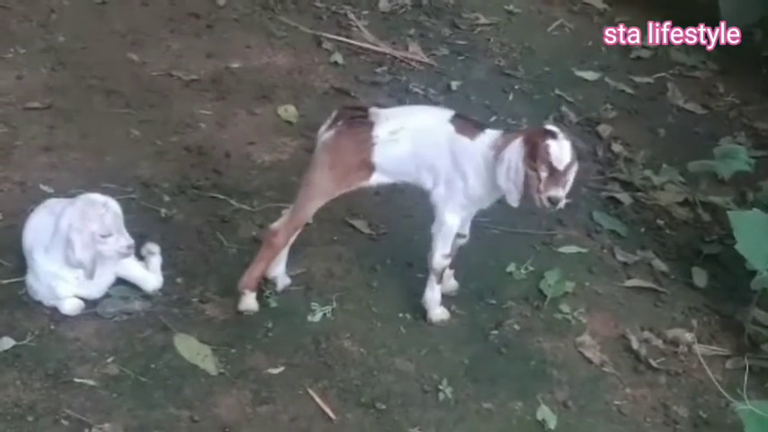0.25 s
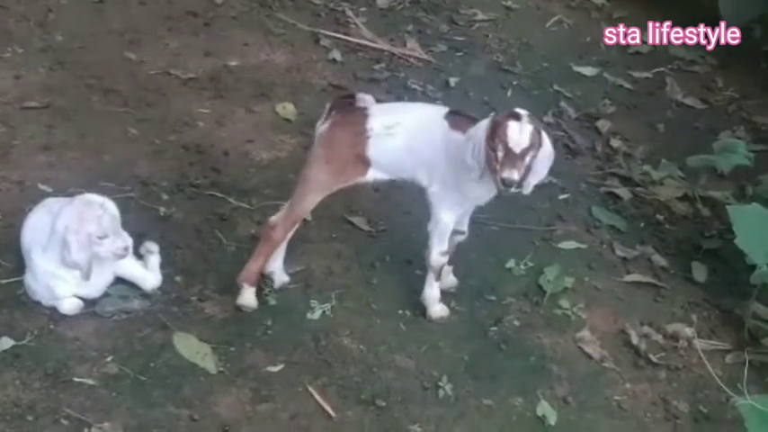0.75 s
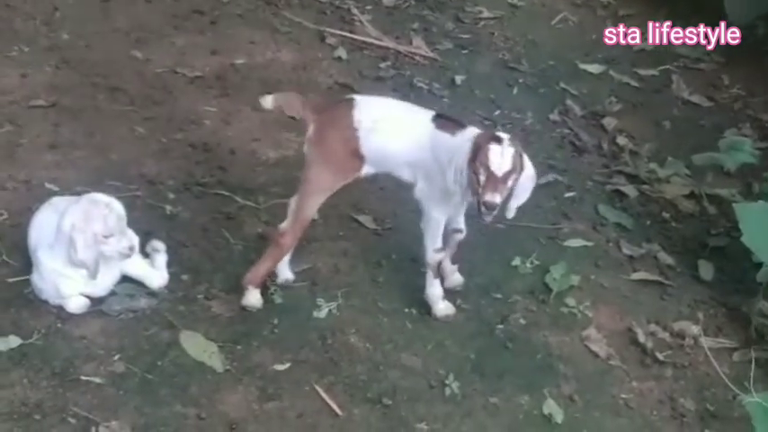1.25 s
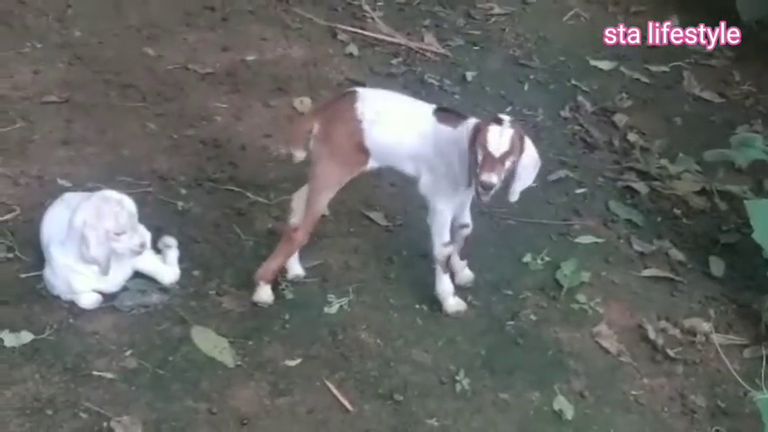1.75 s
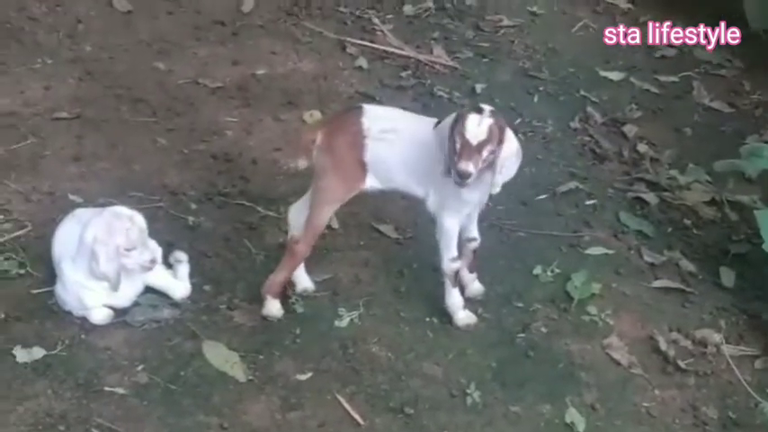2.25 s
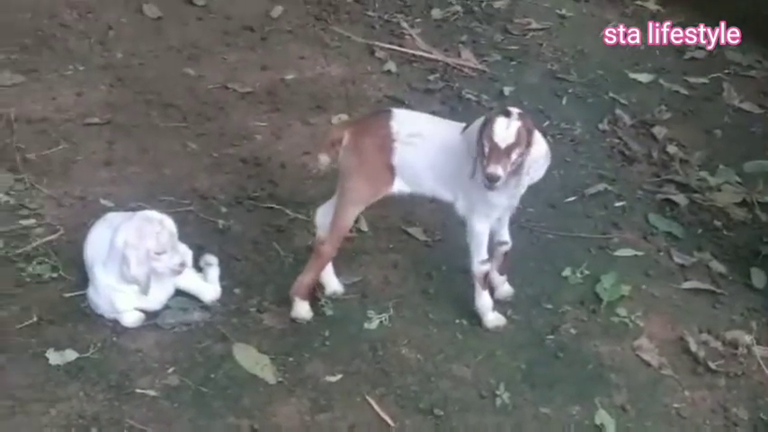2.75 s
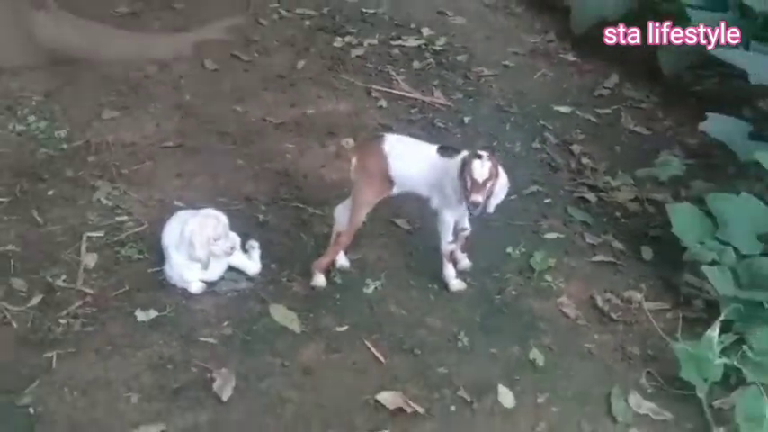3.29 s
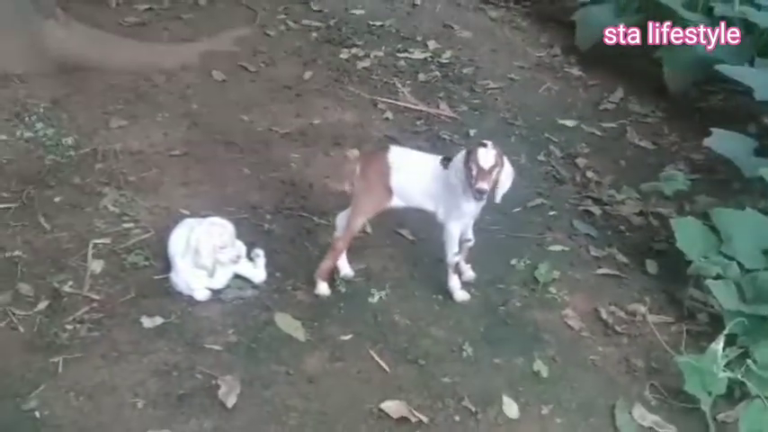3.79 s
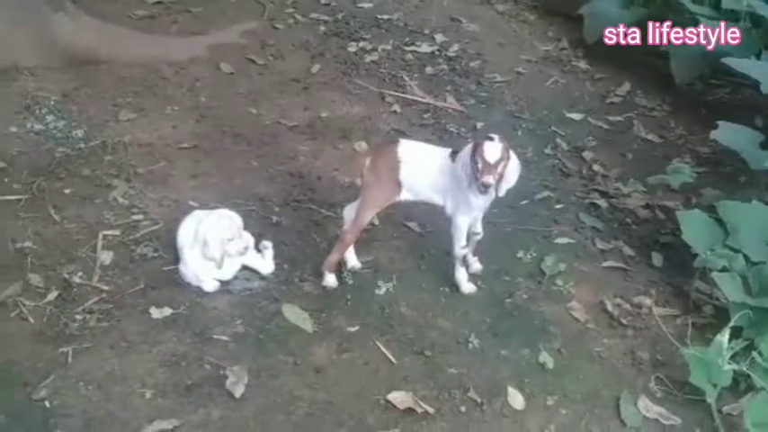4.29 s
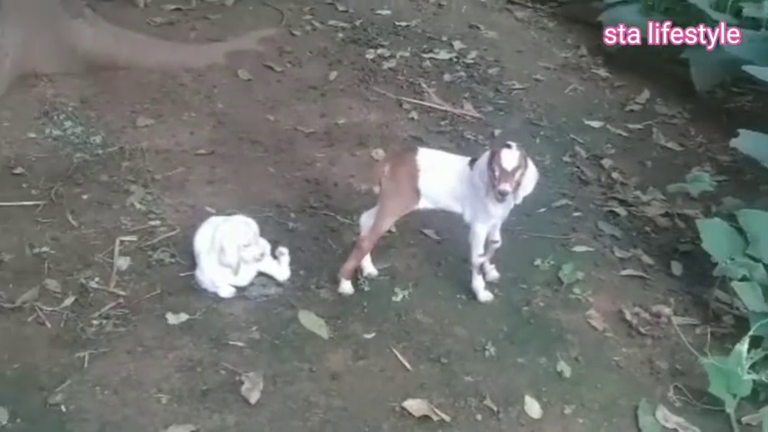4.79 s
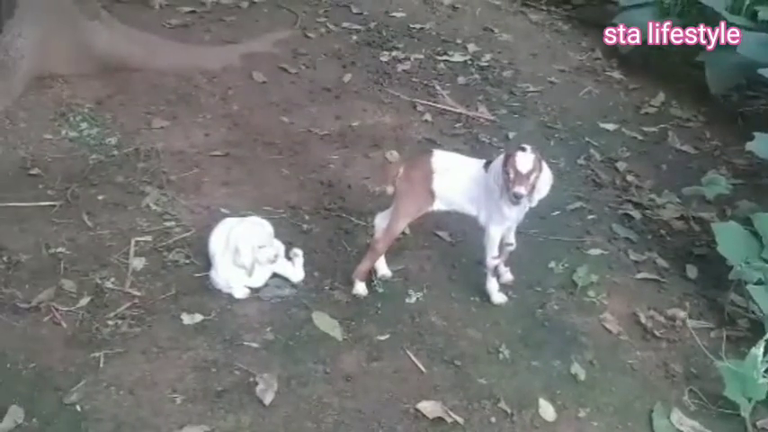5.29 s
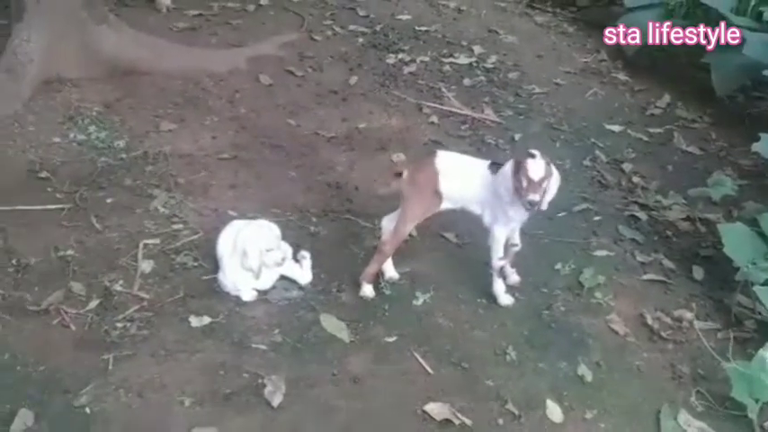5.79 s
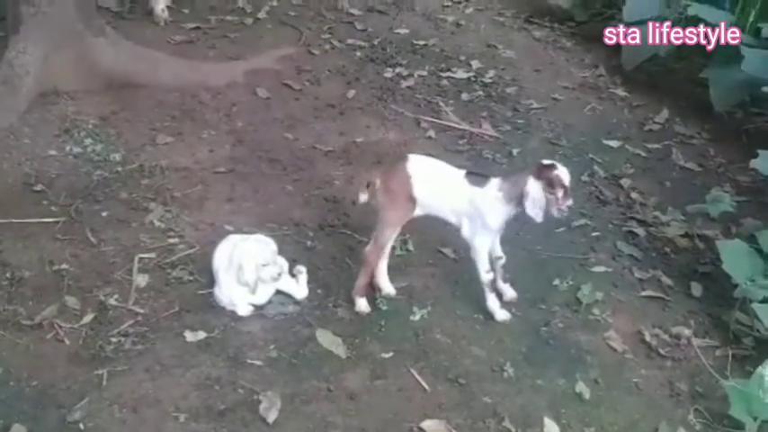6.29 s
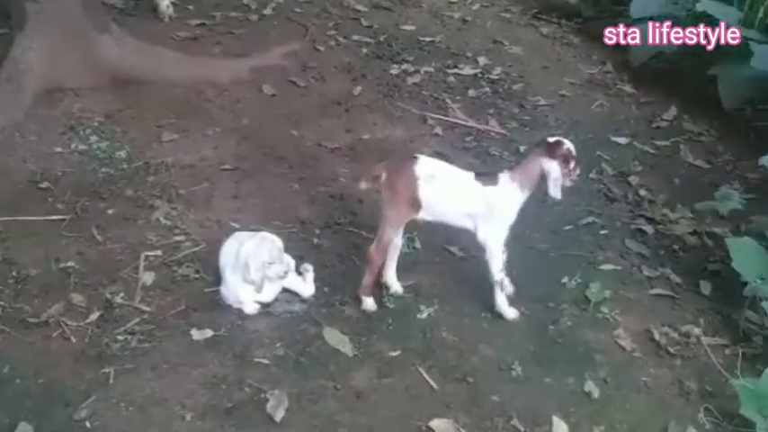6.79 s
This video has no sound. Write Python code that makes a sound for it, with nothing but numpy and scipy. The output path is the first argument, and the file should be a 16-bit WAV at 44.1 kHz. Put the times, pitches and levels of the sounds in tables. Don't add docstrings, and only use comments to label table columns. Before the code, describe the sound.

In a quiet dirt yard, a young goat gives a bright, long quavering bleat about a second after the start, ending in a snort and a few low pops on the left. A shorter, hoarser bleat follows, then a weak broken one near the end. Distant birds peep and whistle downward, a faint insect whines, and soft steps touch the soil over steady hiss. Close hand-held stereo phone microphone.

```python
import sys
import numpy as np
from scipy import signal
from scipy.fft import rfft, irfft, next_fast_len
from scipy.io import wavfile
from scipy.ndimage import uniform_filter1d, minimum_filter1d

SR = 44100
rng = np.random.default_rng(int(sys.argv[2]) if len(sys.argv) > 2 else 0)


def unload_wav(signal):
    wavfile.write(
        sys.argv[1],
        SR,
        np.round(np.clip(np.atleast_2d(signal).T, -1, 1) * 32767).astype(np.int16),
    )


def field_ratio(decibels):
    return 10 ** (np.asarray(decibels, dtype=float) / 20)


N = 310893

# hz, level_db (per Hz)
HISS = [(18, -70), (30, -20.5), (96, -5.5), (490, -9), (543, -9), (760, -4), (1380, -1), (1740, -9.5),
        (2310, -4), (2990, -7.5), (3780, -8), (5870, -18), (8640, -20), (9340, -23.5), (14500, -32.5)]
HISS_DB = -55.5
# hz, level_db
HISS_TRIM = [(4750, -0.45), (5000, -1.5), (6500, 1), (8000, 0.6)]
# hz, likeness (-1 to 1)
LIKENESS = [(60, 1), (180, 0.29), (540, 0.6), (1610, -0.092), (4800, 0.012), (14400, -0.12)]
# hz, left_right_db
LEAN = [(60, 7.5), (130, 17), (290, 11.5), (630, 0), (1370, 1.5), (3000, 0), (6570, -3.5), (14400, 1)]
# start_s, level_db
CHATTER = [(0, -61), (.5, -57), (.72, -52.5), (1.0, -60), (1.3, -56.5), (2.4, -62), (3.3, -94.5),
           (3.9, -58), (4.399, -69.5), (5.3, -68), (6.2, -65.5), (7.05, -61)]
# hz, level_db
CHATTER_COLOUR = [(1700, -34), (2200, 2), (3500, 5.5), (4700, 0.5), (5000, -96), (6000, -52)]

# pitch_hz, level_db
SQUEAL = [(2762, -68), (4129, -69.5), (4587, -76), (5012, -80), (5959, -77), (6874, -81), (7989, -75.5)]
SQUEAL_END_S = 0.5
# start_s, end_s, pitch_hz, level_db
INSECT = [
    (2.328, 3.067, 8440, -72),
    (3.05, 3.331, 7650, -73.5),
    (4.4, 4.75, 8400, -93),
    (4.946, 5.749, 8440, -76),
]

# start_s, length_s, pitch_hz, level_db, left_right_db
SAGGING_NOTES = [(0.106, 0.034, 6060, -66.5, 8), (0.167, 0.059, 2274, -62, 9),
                 (.46, 0.026, 2170, -53.5, 6.5), (0.316, 0.055, 4600, -65, 1),
                 (0.528, 0.033, 3440, -62, 14), (0.653, 0.091, 3840, -64, -4), (.69, 0.028, 2485, -55.5, 6),
                 (0.676, 0.05, 4530, -62, 5), (0.924, 0.024, 2500, -59.5, 1.5),
                 (2.353, 0.045, 4570, -64, -7), (2.601, 0.025, 3860, -61.5, -4),
                 (2.77, 0.034, 3900, -62, -1), (2.956, 0.031, 3905, -64.5, -5),
                 (3.147, 0.035, 3910, -63, -3), (3.173, 0.046, 1250, -61, -6),
                 (4.242, 0.084, 2410, -64, .5), (4.81, 0.093, 1490, -66, 9),
                 (5.774, 0.067, 4640, -63.5, -1), (6.791, 0.06, 4530, -64, -3),
                 (6.85, 0.037, 3400, -68, -2)]
# start_s, length_s, pitch_hz, level_db, left_right_db
RISING_NOTES = [
    (4.294, 0.066, 4180, -65, -8),
    (4.574, 0.13, 4130, -66.5, -1),
    (4.768, .065, 4780, -61, -.5),
    (5.255, 0.088, 4110, -67.5, 0),
]
SAG_SHARE, RISE_SHARE = 0.95, 1.095

# crest_s, pitch_hz, effort_db, throat_to_mouth_db,
# next_dip_sag_hz
QUAVERS = [
    [(1.255, 1099, -35, -22, 94.7), (1.335, 1003, -26.5, -19, 95.3), (1.445, 1019, -24, -14, 89.1),
     (1.561, 975.6, -23.5, -8.5, 92.1), (1.665, 967, -24, -7.5, 57.6), (1.757, 951, -22.5, -9, 65.1),
     (1.868, 957, -25, -6.5, 67.95), (1.968, 962, -24.5, -8.5, 127.2), (2.07, 969.6, -25, -8, 109.7),
     (2.12, 1102, -32, -7, 98.2), (2.165, 903, -34.5, 0.5, 55)],
    [(3.362, 961.5, -30, -1, 132.8), (3.466, 981.5, -27.5, -4, 118.8), (3.566, 1001, -25.5, -3, 149),
     (3.676, 994, -29.5, 0, 109.5), (3.775, 960, -50.5, 3.5, 54.7)],
    [(6.245, 1039, -49, -16, 81), (6.303, 1017, -41.5, 4.5, 79), (6.365, 923, -45, 1.5, 29),
     (6.409, 943.5, -28.5, -7.5, 122), (6.485, 1002, -43, -0.5, 24), (6.52, 983.5, -34.5, -5.5, 133),
     (6.632, 1172, -38.5, -1, 5)],
]
# start_s, end_s, catch_pitch_hz (added at the start), dip_place (0-1 between crests),
# dip_loss_db_per_hz
BLEATS = [
    (1.196, 2.203, -300, 0.5, 0.0928),
    (3.325, 3.84, 761, 0.45, 0.08),
    (6.234, 6.66, 29, .5, 0.06),
]
CATCH_S, CATCH_DB = 0.009, 14.5
START_DB, END_DB = -14.5, -27
# opening_s, wide_s, closing_s, shut_s
JAW = [
    (1.446, 1.463, 2.175, 2.22),
    (3.316, 3.346, 5, 3.91),
    (6.253, 6.275, 6.56, 6.62),
]
SHUT_OPENING, SHUT_DB = 0.23, -11
# crest_hoarseness (0-1), dip_hoarseness (0-1), overtone_fade_db (each top overtone)
HOARSE = [
    (.03, .24, .4),
    (.05, .5, 2),
    (.09, .5, 3),
]
# centre_s, half_length_s, extra_hoarseness (0-1)
RASPS = [(1.25, .035, .2), (1.765, .012, .3), (2.105, .015, .5), (2.14, .02, .5), (2.17, .02, .12),
         (3.585, .01, .2), (3.76, .05, .4), (6.31, .015, .3), (6.385, .01, .25), (6.44, .015, .3),
         (6.49, .012, .3)]
# left_right_db, left_beam_db, treble_db_per_octave
HEAD = [
    (0.1, 14.5, 1.5),
    (0.1, 4, 3),
    (0.1, 13, 0.5),
]
# hz, level_db
MOUTH = [(1500, -74.5), (2350, -10), (2850, -17), (3300, -21), (3850, -12), (4750, -6), (5700, -7.5),
         (6800, -13.5), (8500, -16), (11000, -21), (12500, -27.5), (14500, -57.5)]
RING_HZ, RING_WIDTH_HZ, RING_DB = 4547, 278, 9
# hz, level_db
THROAT = [(300, -27), (650, -37.5), (950, -20), (1250, -14), (1600, -16), (1800, -7), (1980, 2.5),
          (2150, 2.5), (2340, -16.5), (2600, -28.5), (3000, -39)]
# hz, level_db
BREATH = [(600, 0), (1400, 1), (3300, -5), (5000, 7), (12000, 7)]

# start_s, peak_db, pitch_hz, cycles
POPS = [
    (2.107, -43, 249.7, 1.54),
    (2.152, -20, 417, 0.55),
    (2.1582, -18.5, 377, 0.93),
    (2.174, -18.5, 300, 0.32),
    (2.185, -33, 400, 3.9),
    (2.191, -11.5, 300, 0.54),
    (2.2, -31, 263, 0.36),
    (2.21, -32, 303, 2),
    (2.224, -48, 247, 4),
    (2.313, -22.5, 516, 0.21),
]
# start_s, rise_s, t60_s, level_db, left_right_db
SNORTS = [
    (2.174, 0.0078, 0.25, -29.5, 2),
    (2.226, 0.015, 0.091, -60, -13),
    (3.70, 0.0091, 0.3, -39.5, -1),
    (3.765, 0.011, 0.11, -44, -4),
    (6.644, 0.0078, 0.19, -51, 0),
    (6.715, 0.0053, 0.098, -55, -2),
]
# hz, level_db
NOSE = [(300, -24), (1000, -18), (2100, 3.5), (3200, -5.5), (5500, -2.5), (7500, 2.5), (10000, -8),
        (14000, -19)]
# start_s, peak_db, left_right_db
TICKS = [
    (2.3014, -51, 8),
    (4.3185, -38, -5),
]
# hz, level_db
SNAP = [(1200, -38), (2500, 22), (4500, 2), (7500, -11), (10500, -12), (14000, -40)]

# end_s, level_db, pitch_share, left_right_db, high_part_db
WHISTLES = [
    (4.11, -49.5, 1.01, -6, -6),
    (4.977, -48, 0.97, -.5, 0.5),
    (6.045, -50, 1.005, -0.5, -3.5),
]
# from_end_s, level_db, pitch_hz
WHISTLE_FALL = [(-.152, -15, 5060), (-.125, -2, 4760), (-.078, -2.5, 4290), (-.06, 0.5, 3630),
                (-.028, -3, 3094), (0, -6.5, 2340)]
OCTAVE_DB = -29
# start_s, rise_s, t60_s, level_db, left_right_db
STEPS = [
    (5.21, 0.019, 0.23, -52, 4),
    (5.271, 0.012, 0.44, -57, 6),
    (5.318, 0.0089, 0.11, -62, -7),
    (5.921, 0.0055, 0.17, -57.5, -1),
    (6.63, 0.016, 0.23, -55.5, 7),
]
# hz, level_db
SOIL = [(100, -21), (260, -4.5), (430, 3), (700, -1), (1400, -0.5), (2500, -42)]

# hz, t60_s
YARD = [(500, 0.1), (2000, 0.34), (5000, 0.36), (12000, 0.047)]
GOAT_ROOM_DB, BIRD_ROOM_DB = -17, -1.0
MASK_DB, MASK_CUT_DB, MASK_FROM_HZ = 26.5, -22, 1500


def evened(x):
    return x / np.sqrt(np.mean(x ** 2) + 1e-20)


def read(points, hz):
    f, value = np.transpose(points)
    return np.interp(np.log(hz + 1), np.log(f + 1), value)


def add(mix, s, sound):
    part = mix[..., round(s * SR):][..., :sound.shape[-1]]
    part += sound[..., :part.shape[-1]]


def panned(x, db):
    return x * field_ratio(np.array([[db / 2], [-db / 2]]))


def colour(x, points, slope_db=0):
    size = next_fast_len(len(x) + 512)
    hz = np.fft.rfftfreq(size, 1 / SR)
    gain_db = read(points, hz) + slope_db * np.log2(np.maximum(hz / 5000, 1))
    return irfft(rfft(x, size) * field_ratio(gain_db), size)[:len(x)]


def resonate(x, hz, width):
    turn = np.exp(2j * np.pi * hz * np.arange(len(x)) / SR)
    r = np.exp(-np.pi * width / SR)
    return 2 * (turn * signal.lfilter([1 - r], [1, -r], x / turn)).real


def drift(size, span):
    return evened(uniform_filter1d(uniform_filter1d(rng.standard_normal(size), span), span))


def tone(hz):
    return np.sqrt(2) * np.sin(2 * np.pi * np.cumsum(hz) / SR)


def hiss():
    frames, hz = N // 256 + 5, np.fft.rfftfreq(1024, 1 / SR)
    a, b, c, d, patches, blobs = rng.standard_normal((frames, 513, 6)).T
    patches = evened(uniform_filter1d(uniform_filter1d(patches, 10, 0), 12, 1))
    blobs = evened(uniform_filter1d(uniform_filter1d(blobs, 5, 0), 9, 1))

    floor = evened(field_ratio(read(HISS, hz) + read(HISS_TRIM, hz)))[:, None]
    floor = floor * field_ratio(HISS_DB + 2.3 * patches + 1.36 * drift(frames, 20))
    chatter_db = np.interp(np.arange(frames) * 256 / SR, *np.transpose(CHATTER))
    birds = evened(field_ratio(read(CHATTER_COLOUR, hz)))[:, None] * field_ratio(chatter_db + 5.2 * blobs)

    same = np.clip(read(LIKENESS, hz), -1, 1)[:, None]
    left = a + 1j * b
    right = same * left + np.sqrt(1 - same ** 2) * (c + 1j * d)
    lean = read(LEAN, hz)[:, None] / 2
    z = np.array([left, right]) * np.hypot(floor, birds) * field_ratio(np.array([lean, -lean])) / 26
    return signal.istft(z, nperseg=1024, noverlap=768)[1][:, :N]


def drone(start, end, hz, db, width):
    size = round((end - start) * SR)
    noises = rng.standard_normal((2, size))
    line = [evened(resonate(resonate(z, hz, width), hz, width)) for z in noises]
    return start, np.array(line) * field_ratio(db) * signal.windows.tukey(size, .15)


def note(s, length, hz, db, pan_db, share):
    size = round(length * SR)
    pitch = np.linspace(hz, hz * share, size) * (1 + .02 * drift(6000, 60)[:size])
    peep = tone(uniform_filter1d(pitch, size=40)) * field_ratio(db) * np.sqrt(np.hanning(size))
    return s, panned(peep, pan_db)


def breath(quavers, start, end, catch_hz, dip_at, db_per_hz):
    crest, pitch, effort, _, sag = np.transpose(quavers)
    sag = np.r_[0, sag]

    def between(c, first, last):
        return np.r_[first, c[:-1] + dip_at * np.diff(c), last]

    def woven(dips, crests):
        return np.r_[np.c_[dips[:-1], crests].ravel(), dips[-1]]

    s = woven(between(crest, start, end), crest)
    hz = woven(between(pitch, pitch[0], pitch[-1]) - sag, pitch)
    dip_db = between(effort, effort[0] + START_DB, effort[-1] + END_DB) - db_per_hz * sag
    db = woven(dip_db, effort)

    t = np.arange(start, end, 1 / SR)
    knots = np.arange(len(s))
    place = np.interp(t, s, knots)
    swing = 1 - np.cos(np.pi / 2 * (1 - abs(place % 2 - 1))) ** 2.4
    eased = np.floor(place) + np.where(place % 2 < 1, swing, 1 - swing)
    hz = uniform_filter1d(np.interp(eased, knots, hz), size=350)
    db = uniform_filter1d(np.interp(eased, knots, db), size=350)
    slack = np.clip((np.interp(t, crest, pitch) - hz) / 85, 0, 1)
    catch = np.exp(-(t - start) / CATCH_S)
    return t, hz + catch_hz * catch, db, slack, catch


def fold_pulses(turns, muffle_db, fade_db):
    size = len(turns)
    folds = np.zeros(size)
    for k in range(1, 16):
        level_db = (2.0 + 0.2 * k) * drift(size, 300)
        level_db = level_db - muffle_db * max(2 * k - 9, -3) - fade_db * max(k - 6, 0)
        phase = 2 * np.pi * k * turns + k * k / 5 + 0.15 * k * drift(size, 1500)
        folds += field_ratio(level_db) * np.cos(phase)
    return folds


def bleat(quavers, call, jaw, hoarse, head):
    pan_db, beam_db, slope_db = head
    crest_rough, dip_rough, fade_db = hoarse
    t, hz, db, slack, catch = breath(quavers, *call)
    size = len(t)
    rough = crest_rough + (dip_rough - crest_rough) * slack ** 2
    for at, half, extra in RASPS:
        rough = rough + extra * np.exp(-((t - at) / half) ** 4)
    rough = np.clip(rough, 0, 1)

    jitter = .003 * drift(size, 90) + .04 * rough * drift(size, 30)
    turns = np.cumsum(hz * (1 + jitter)) / SR
    puffs = colour((0.62 + np.exp(-(turns % 1) / 0.64)) * rng.standard_normal(size), BREATH)
    level = field_ratio(db + .6 * drift(size, 150)) * signal.windows.tukey(size, .02)

    wide = np.interp(t, jaw, [0, 1, 1, 0])
    opening = SHUT_OPENING + (0.92 - SHUT_OPENING) * wide
    ring = field_ratio(RING_DB * opening + np.array([[beam_db / 2], [-beam_db / 2]]) * opening)
    muffle_db = 0.9 * (1 - opening) + 3.4 * catch
    at, _, _, throat_db, _ = np.transpose(quavers)
    throat_level_db = 10.5 + np.interp(t, at, throat_db) + CATCH_DB * catch - 6.9 * slack

    ports = []
    for port in range(2):
        folds = fold_pulses(turns, muffle_db, fade_db)
        drive = ((1 - rough) * folds / 2.7 + .65 * rough * puffs) * level
        mouth = colour(drive, MOUTH, slope_db) * field_ratio(11.5 + SHUT_DB * (1 - wide))
        mouth = mouth + (ring[port] - 1) * resonate(mouth, RING_HZ, RING_WIDTH_HZ)
        throat = colour(drive, THROAT) * field_ratio(throat_level_db)
        ports.append(mouth + throat)
    return t[0], panned(np.array(ports), pan_db)


def pop(s, db, hz, cycles):
    u = np.arange(900) / SR * hz
    push = -np.sin(2 * np.pi * u ** 0.8) * np.exp(-2.5 * u / cycles)
    push = uniform_filter1d(push, size=14, mode="constant")
    return s, push * field_ratio(db + 4.5) * field_ratio(np.array([[0], [-38]]))


def puff(s, rise, t60, db, pan_db, tint):
    t = np.arange(12000) / SR
    shape = np.minimum(t / rise, 1) ** 2 * field_ratio(db - 60 * np.maximum(t - rise, 0) / t60)
    noises = rng.standard_normal((2, len(t)))
    return s, panned(np.array([shape * evened(colour(z, tint)) for z in noises]), pan_db)


def tick(s, db, pan_db):
    t = np.arange(300) / SR
    return s, panned(evened(colour(rng.standard_normal(300), SNAP)) * field_ratio(db - 60 * t / .008), pan_db)


def whistle(end, level_db, share, pan_db, head_db):
    s, db, hz = np.transpose(WHISTLE_FALL)
    t = np.arange(s[0], s[-1], 1 / SR)
    pitch = uniform_filter1d(np.interp(t, s, hz * share), 200)
    high_db = head_db * np.clip((pitch - 3700) / 900, 0, 1)
    level = field_ratio(level_db + np.interp(t, s, db) + high_db + 0.86 * drift(len(t), 60))
    sound = (tone(pitch) + field_ratio(OCTAVE_DB) * tone(2 * pitch)) * level
    return end + s[0], panned(sound * signal.windows.tukey(len(t), .1), pan_db)


def yard(x, first):
    taps = np.zeros((2, SR // 2))
    slots = np.arange(first, SR // 2 - 40, 30)
    at = slots + rng.integers(0, 30, (2, len(slots)))
    np.put_along_axis(taps, at, rng.choice([-1., 1.], at.shape), 1)
    hz, t, z = signal.stft(taps, SR, nperseg=256)
    tail = signal.istft(z * field_ratio(-60 * t / read(YARD, hz)[:, None]), SR, nperseg=256)[1]
    return signal.fftconvolve(x, tail / np.linalg.norm(tail[0]), axes=1)[:, :N]


def masked(x):
    hz, _, z = signal.stft(x, SR, nperseg=1024)
    power = uniform_filter1d((abs(z) ** 2).mean(0), size=5, axis=0)
    power = uniform_filter1d(power, size=5, axis=1)
    power_db = 10 * np.log10(abs(power) + 1e-20)
    loudest_db = -minimum_filter1d(-power_db, size=45, axis=0, origin=8)
    cut = np.clip((loudest_db - power_db - MASK_DB) / 2, 0, 1) * (hz > MASK_FROM_HZ)[:, None]
    return signal.istft(z * field_ratio(MASK_CUT_DB * cut), SR, nperseg=1024)[1][:, :N]


def scene():
    goat, birds, near = np.zeros((3, 2, N))
    for hz, db in SQUEAL:
        add(near, *drone(0, SQUEAL_END_S, hz, db + 5.5, 27))
    for row in INSECT:
        add(near, *drone(*row, 150))
    for row in SAGGING_NOTES:
        add(birds, *note(*row, SAG_SHARE))
    for row in RISING_NOTES:
        add(birds, *note(*row, RISE_SHARE))
    for rows in zip(QUAVERS, BLEATS, JAW, HOARSE, HEAD):
        add(goat, *bleat(*rows))
    for row in POPS:
        add(near, *pop(*row))
    for row in SNORTS:
        add(goat, *puff(*row, NOSE))
    for row in TICKS:
        add(near, *tick(*row))
    for row in WHISTLES:
        add(birds, *whistle(*row))
    for row in STEPS:
        add(near, *puff(*row, SOIL))
    goat = goat + field_ratio(GOAT_ROOM_DB) * yard(goat, first=150)
    birds = birds + field_ratio(BIRD_ROOM_DB) * yard(birds, first=300)
    return goat + birds + near + hiss()


def low_pass(x):
    return signal.sosfilt(signal.butter(12, 14970, fs=SR, output="sos"), x)


def record(dry):
    bass_cut = signal.butter(3, 68, "high", fs=SR, output="sos")
    treble_edge = signal.firwin(255, 14600, window=("kaiser", 8), fs=SR)
    mix = signal.sosfilt(bass_cut, masked(dry))
    mix = signal.oaconvolve(mix, treble_edge[None], "same")
    return low_pass(mix)


dry = scene()
out = record(dry)
unload_wav(out)
```